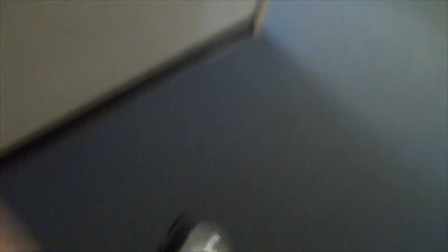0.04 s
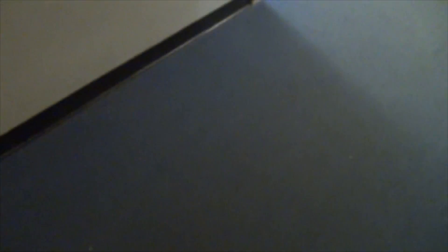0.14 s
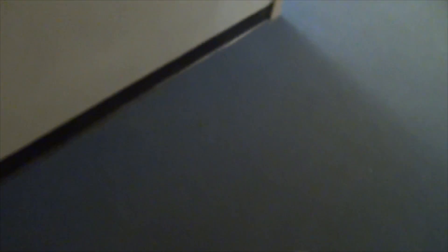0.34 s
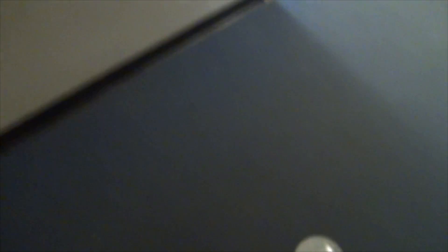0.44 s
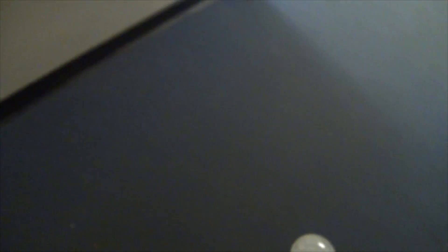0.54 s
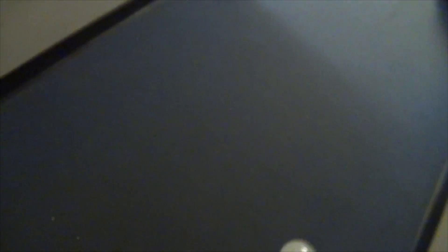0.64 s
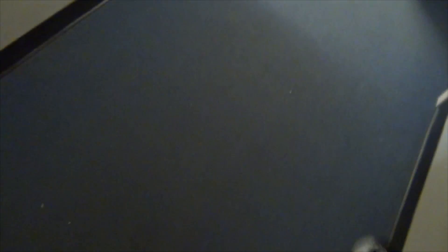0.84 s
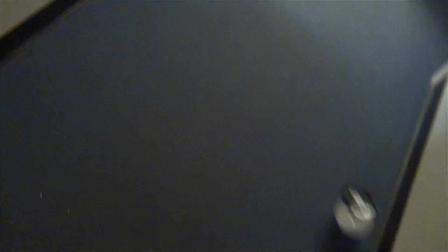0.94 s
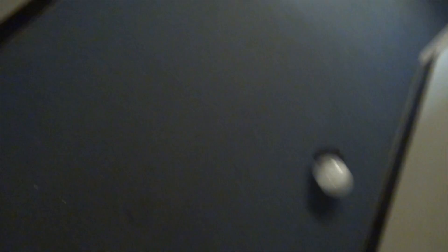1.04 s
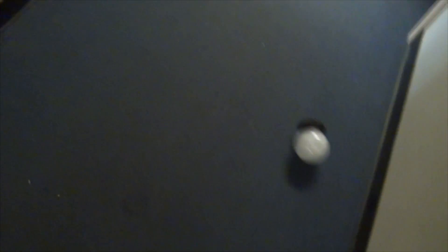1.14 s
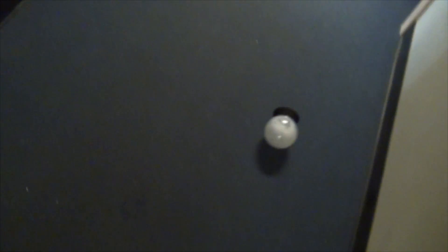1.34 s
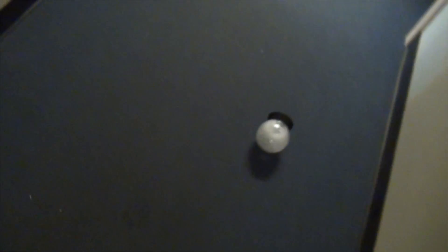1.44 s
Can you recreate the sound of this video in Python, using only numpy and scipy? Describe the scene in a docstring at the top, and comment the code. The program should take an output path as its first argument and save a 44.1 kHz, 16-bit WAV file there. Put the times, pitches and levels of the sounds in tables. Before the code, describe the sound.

In a narrow corridor, a thrown hollow plastic ball lands loudly near the microphone, bounces on with several sharp knocks and ends in soft taps. Each hit leaves a short, boomy echo above a quiet ventilation hum.

```python
"""Plastic globe in a hallway

A hollow plastic globe is thrown down a narrow hallway: it thumps on the floor, cracks against the
walls and lands again with lighter taps. Each contact rings the shell and the struck surface; the
hallway answers with a flutter echo, a bright tail and booming standing waves. Ventilation noise
and tiny plastic ticks lie underneath. An automatic gain ducks under the loud blows."""
import sys
import numpy as np
from scipy import signal
from scipy.fft import rfft, irfft
from scipy.io import wavfile
from scipy.ndimage import uniform_filter1d

SR = 44100
rng = np.random.default_rng(int(sys.argv[2]) if len(sys.argv) > 2 else 0)


def wav_record(signal):
    """Record a signal, one row per channel, as 16-bit PCM in the file named by sys.argv[1]."""
    frames = np.transpose(np.atleast_2d(signal))
    bounded = np.clip(frames, -1, 1)
    # unit amplitude maps onto the largest positive 16-bit level
    quanta = np.round(bounded * 32767).astype(np.int16)
    wavfile.write(sys.argv[1], SR, quanta)


N = 66150
T = np.arange(N) / SR


def from_db(db):
    """Decibels to gain."""
    return 10 ** (np.asarray(db) / 20)


def at_hz(points, hz, column=1):
    """Table column interpolated over log frequency."""
    points = np.array(points)
    return np.interp(np.log(hz + 1e-9), np.log(points[:, 0]), points[:, column])


def unit_energy(x):
    """Scale to a mean energy of 1 per channel."""
    return x / np.sqrt(np.mean(np.sum(x ** 2, axis=-1)))


def delayed(x, delay_s):
    """Shift later, keeping N samples."""
    lag = int(np.clip(delay_s * SR, 0, N - 1))
    return np.concatenate([np.zeros_like(x[..., :lag]), x[..., :N - lag]], axis=-1)


def convolve(x, response):
    """Pass a sound through an impulse response."""
    return irfft(rfft(x, 2 * N) * rfft(response, 2 * N))[..., :N]


def stereo_noise(spread):
    """White noise; spread is the side-to-mid ratio."""
    mid, side = rng.standard_normal((2, N))
    return np.array([mid + spread * side, mid - spread * side])


def pulse(*spectra):
    """Minimum-phase click shaped by the sum of the dB curves."""
    hz = np.arange(N + 1) * SR / (2 * N)
    level_db = sum(at_hz(spectrum, hz) for spectrum in spectra)
    cepstrum = irfft(np.log(from_db(level_db)))
    cepstrum[1:N] *= 2
    cepstrum[N + 1:] = 0
    return irfft(np.exp(rfft(cepstrum)))[:N]


def swell(t60_s, rise_s):
    """Exponential rise and decay."""
    return (1 - np.exp(-T / rise_s)) * np.exp(-np.log(1000) * T / t60_s)


def ring(modes, rise_s=1 / SR):
    """One decaying sinusoid per mode."""
    return sum(from_db(db) * swell(t60_s, rise_s) * np.cos(2 * np.pi * hz * T)
               for hz, db, t60_s in modes)


# ventilation spectrum: freq_hz, relative_density_db
VENT_SPECTRUM = [(25, -16), (50, -9), (80, -7.5), (110, -12.5), (145, -5.5), (190, -5.5), (280, -2),
                 (420, 1), (520, -3.5), (800, -3), (1100, -10), (1900, -16.5), (3000, -20.5), (6000, -24.5),
                 (10000, -24.5), (16000, -30)]


def ventilation(rms_db=-41):
    """Steady hum and hiss of moving air."""
    white = rfft(stereo_noise(spread=0.31))
    hz = np.arange(white.shape[1]) * SR / N
    air = irfft(white * from_db(at_hz(VENT_SPECTRUM, hz)), N)
    return from_db(rms_db) * np.sqrt(N) * unit_energy(air)


# ticks before the first blow: start_s, pitch_hz, level_db
HANDLING_TICKS = [(0.045, 10350, -30), (0.149, 7700, -33)]


def plastic_ticks(stray_count=16, t60_s=0.007):
    """Thin ticks of handled plastic, plus fainter ones at random times."""
    strays = rng.uniform(low=[0, 5500, -51], high=[N / SR, 13000, -41], size=(stray_count, 3))
    return sum(delayed(ring([(hz, db, t60_s)]), start_s)
               for start_s, hz, db in [*HANDLING_TICKS, *strays])


# shell modes: pitch_hz, level_db, t60_s
SHELL_MODES = [(1433.4, -48, 0.021), (1573, -71, 0.12), (1918, -44.5, 0.058), (2857, -49, 0.09),
               (4530, -67, .15), (5050, -55, 0.024), (5870, -43, 0.064), (6450, -57, 0.11),
               (6640, -46, 0.059), (6930, -67, .12), (7750, -43.5, .07), (8930, -35.5, 0.016)]
# contact spectrum: freq_hz, level_db
CONTACT_SPECTRUM = [(40, -45.5), (70, 2), (120, 13.5), (190, 10), (300, 13.5), (500, 12), (800, 10),
                    (1150, 4.5), (1900, 2.5), (2800, -0.5), (4200, -4.5), (5500, -4), (7000, -2.5),
                    (8400, -7), (11000, -8), (13500, -11.5), (16000, -22.5)]


def shell_contact(*colours):
    """A contact pulse, coloured by dB curves, rings the hollow shell."""
    shell = signal.unit_impulse(N) + ring(SHELL_MODES)
    return convolve(pulse(CONTACT_SPECTRUM, *colours), shell)


# direct path, brighter than the room: freq_hz, gain_db
DIRECT_PATH = [(150, 0.5), (1000, -4.5), (3000, -1.5), (7000, 2.5), (12000, 3)]


def shell_crack(decay_s, gain_db=13, spread=0.26):
    """Milliseconds of dense shell vibration, heard by the direct path."""
    fade = np.exp(-T / decay_s)
    spectrum = rfft(rng.standard_normal((2, N)) * fade)
    whitened = irfft(spectrum / (np.abs(spectrum) + 1e-12), N)
    mid, side = whitened * np.sqrt(fade)
    burst = unit_energy(np.array([mid + spread * side, mid - spread * side]))
    return from_db(gain_db) * convolve(burst, pulse(DIRECT_PATH))


# long shell modes: pitch_hz, level_db, t60_s
AFTER_RING_MODES = [(2351, -27, 0.26), (4440, -52, 0.44), (5770, -53, .4), (6500, -41, 0.74),
                    (6900, -24, 0.23), (7100, -49, 0.4), (7300, -44, .45)]


def shell_after_ring():
    """The shell rings on thinly in flight."""
    return ring(AFTER_RING_MODES)


# hallway reverberation: freq_hz, t60_s, rise_s
TAIL_TIMES = [(102, 0.7, 0.027), (235, 0.69, 0.011), (594, 0.41, 0.026), (1510, 0.32, 0.002),
              (3650, 0.41, 0.0017), (7100, 0.35, 0.0098), (14100, 0.34, 0.0024)]


def hallway_tail(gain_db=22, spread=0.39, narrow_below_hz=180):
    """Diffuse reflections: lows build more slowly and last longer."""
    edges_hz = np.geomspace(45, 17000, 18)
    tail = 0
    for low, high in zip(edges_hz, edges_hz[1:]):
        hz = np.sqrt(low * high)
        noise = stereo_noise(spread * min(1, hz / narrow_below_hz))
        envelope = swell(t60_s=at_hz(TAIL_TIMES, hz), rise_s=at_hz(TAIL_TIMES, hz, column=2))
        bandpass = signal.butter(3, [low, high], "band", fs=SR, output="sos")
        band = unit_energy(signal.sosfilt(bandpass, noise * envelope))
        tail = tail + band * np.sqrt(2 * (high - low) / SR)  # equal energy per Hz
    return from_db(gain_db) * tail


# hallway modes: pitch_hz, level_db, t60_s
HALLWAY_MODES = [(76.8, -44, 1.4), (125.4, -60, 0.99), (149.8, -40, 1.32), (212.6, -40, 1),
                 (267.2, -46, .55), (308.6, -40.5, 0.42), (392.4, -31, 0.53), (435.5, -25.5, 0.33),
                 (476, -48, 0.28), (557, -60, 0.17), (653.4, -40.5, 0.96), (772, -55, 0.29),
                 (893, -35, 0.43), (994, -64, 0.32), (1465, -48, 0.26)]


def standing_waves():
    """The air in the hallway booms at its resonances."""
    return ring(HALLWAY_MODES, rise_s=0.027)


# floor and ceiling reflections: delay_s, gain_db, left_over_right_db
FLUTTER_ECHOES = [(.0152, -0.5, 2.5), (.0298, -4.5, 6), (.0445, -12, 3)]


def flutter_echo(crack):
    """The crack bounces between floor and ceiling."""
    return sum(from_db([[db + pan_db / 2], [db - pan_db / 2]]) * delayed(crack, delay_s)
               for delay_s, db, pan_db in FLUTTER_ECHOES)


# band centres: bass_hz, low_mid_hz, mid_hz, treble_hz
BAND_CENTRES_HZ = [140, 450, 1700, 7500]
# hard cracks flanked by dull contacts: start_s, level_db, bass_db, low_mid_db, mid_db, treble_db,
# room_db, crack_decay_s, resonance_hz, lift_db
GLOBE_BLOWS = [(0.2108, 0, 4.5, 5, -2.5, -12, 3, 0.0076, 293, 3),
               (0.2121, 6, -12, -17, -12.5, -5, -4.5, 0.0032, 10500, 3.5),
               (0.2700, -3, 7, 0.5, -1.5, -25.5, -2.5, 0.0088, 660, -2.5),
               (0.7305, -9, -0.5, 4.5, 1.5, -20.5, 2, 0.0036, 773, 10.5),
               (0.733, 3, -19, -9.5, -6, 1.5, -2, 0.0013, 2030, 4.5),
               (0.7640, 0, -12, 2, -14, -41, -9, 0.015, 778, 18.5),
               (0.8973, -1, -22, -16, 4, -26, -8, .0018, 1500, 8),
               (0.9101, 1.5, -11.5, -0.5, -1.5, 1.5, -2, 0.0034, 7700, 2.5),
               (1.1215, -3.5, -6, 10.5, 0.5, -7, -15, 0.013, 4870, 7.5)]


def blows(resonance_edge_ratio=1.32):
    """The globe hits floor and walls; each blow excites shell and hallway in its own colour."""
    standing, after_ring = standing_waves(), shell_after_ring()
    out = 0
    for start_s, level_db, *bands_db, room_db, crack_decay_s, hz, lift_db in GLOBE_BLOWS:
        colour = list(zip(BAND_CENTRES_HZ, bands_db))
        resonance = [(hz / resonance_edge_ratio, 0), (hz, lift_db), (hz * resonance_edge_ratio, 0)]
        contact = shell_contact(colour, resonance)
        crack = shell_crack(crack_decay_s)
        lingering = from_db(room_db) * (flutter_echo(crack) + hallway_tail() + standing + after_ring)
        out = out + from_db(level_db) * delayed(convolve(contact, crack + lingering), start_s)
    return out


# floor and wall panels: start_s, pitch_hz, level_db, t60_s
PANEL_MODES = [(0.216, 269, -8, 0.73), (0.225, 293.5, -5, 0.41), (0.278, 118.6, -12, 1),
               (0.305, 145, -2.5, 0.29), (0.738, 135, -15, 0.22), (0.748, 432, -2, 0.083),
               (0.748, 504.8, -11, 0.22), (0.785, 128.4, -16, 0.4), (0.914, 393.2, -3, 0.19),
               (0.913, 581, -21, 0.57), (0.95, 302, -15.5, 0.23), (1.123, 140, -35, 0.8),
               (1.14, 384.6, -17.5, 0.27), (1.13, 507, -20, 0.37)]


def panel_booms():
    """Struck floor and walls swell into a hollow boom just after the blows."""
    return sum(delayed(ring([mode], rise_s=0.014), start_s) for start_s, *mode in PANEL_MODES)


# light contacts: start_s, level_db, treble_db
SETTLING_TAPS = [(1.199, -27, 2), (1.237, -18.5, -8), (1.243, -13, -11.5)]


def settling_taps(bass_db=-14, room_db=-11.5):
    """The shell settles in light touches with little bass."""
    contacts = 0
    for start_s, level_db, treble_db in SETTLING_TAPS:
        colour = [(300, bass_db), (3500, 0), (9000, treble_db)]
        contacts = contacts + from_db(level_db) * delayed(shell_contact(colour), start_s)
    return convolve(contacts, shell_crack(decay_s=0.008) + from_db(room_db) * hallway_tail())


def automatic_gain(x, threshold_db=-23, slope=0.11, release_db_per_s=7.5, attack_s=0.0027):
    """The gain ducks under loud blows and creeps back as the held peak level falls."""
    power = uniform_filter1d(np.mean(x ** 2, axis=0), size=220)  # 5 ms
    level_db = 10 * np.log10(np.abs(power) + 1e-12)
    held_db = np.maximum.accumulate(level_db + release_db_per_s * T) - release_db_per_s * T
    excess_db = np.maximum(held_db - threshold_db, 0)
    pole = np.exp(-1 / (attack_s * SR))
    duck_db = signal.lfilter([1 - pole], [1, -pole], slope * excess_db)
    return x * from_db(-duck_db)


def scene():
    """The bouncing globe over the quiet of the hallway."""
    globe = blows() + panel_booms() + settling_taps()
    return globe + ventilation() + plastic_ticks()


def record(dry):
    """Automatic gain, soft clip, steep low-pass."""
    ceiling, stopband_hz = 1.2, 16450
    rounded = ceiling * np.tanh(automatic_gain(dry) / ceiling)
    lowpass = signal.cheby2(20, 70, stopband_hz, fs=SR, output="sos")
    return signal.sosfilt(lowpass, rounded)


dry = scene()
out = record(dry)
wav_record(out)
```